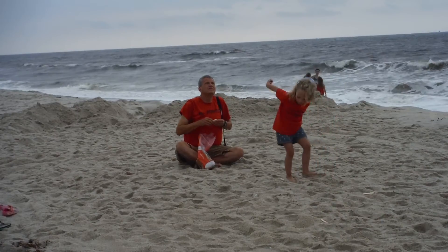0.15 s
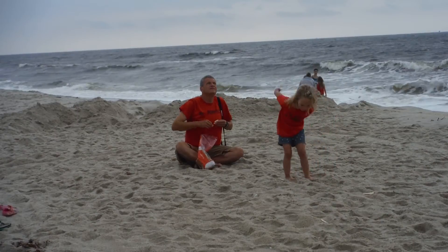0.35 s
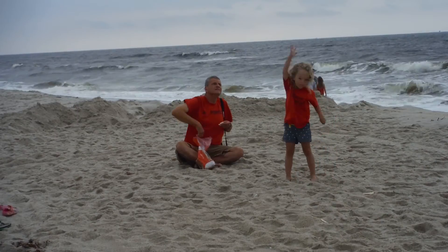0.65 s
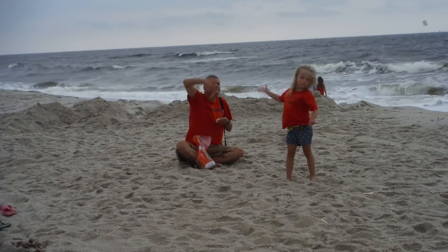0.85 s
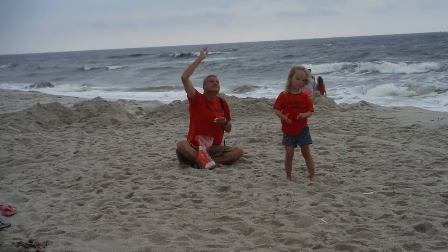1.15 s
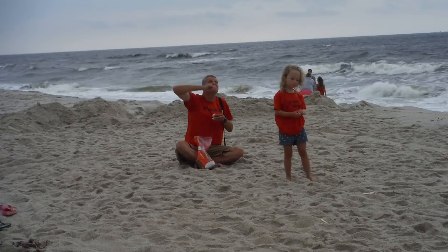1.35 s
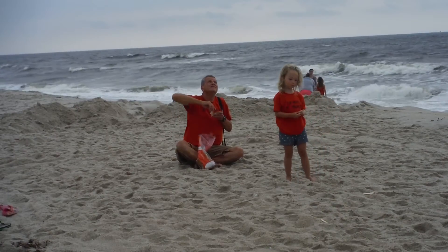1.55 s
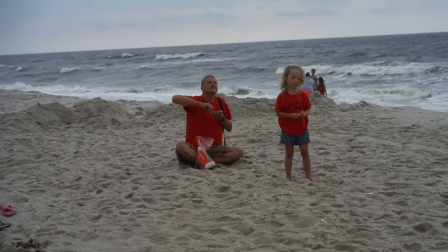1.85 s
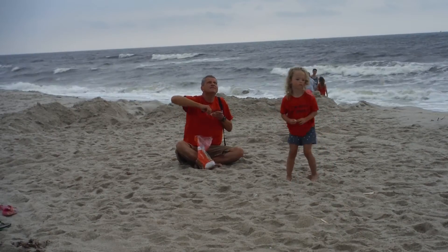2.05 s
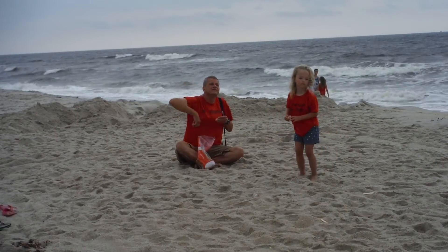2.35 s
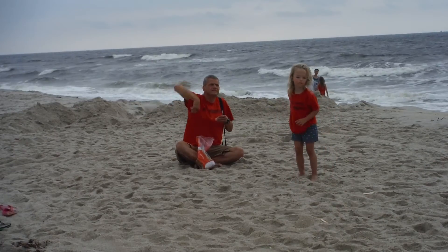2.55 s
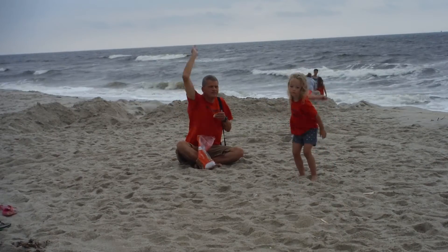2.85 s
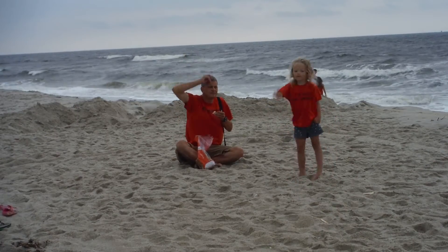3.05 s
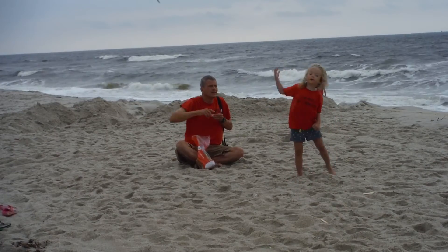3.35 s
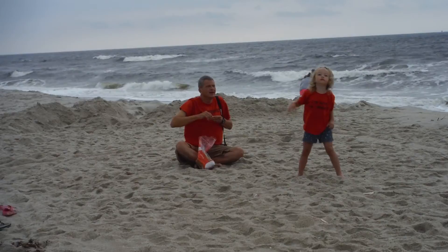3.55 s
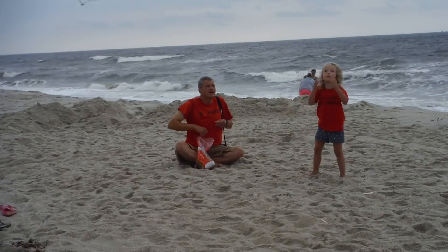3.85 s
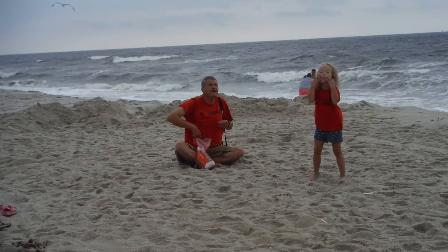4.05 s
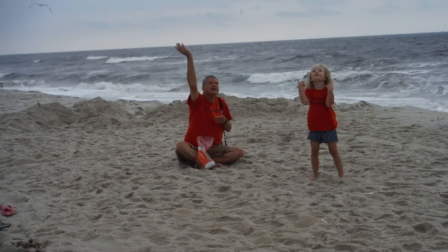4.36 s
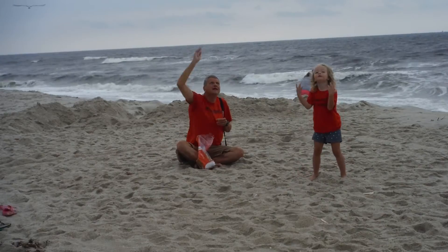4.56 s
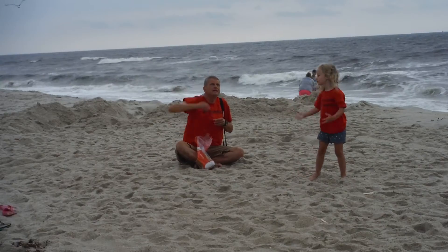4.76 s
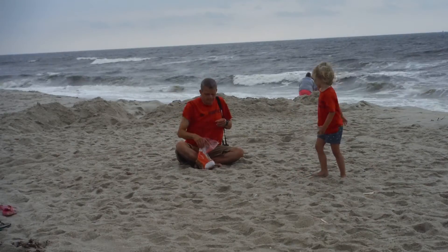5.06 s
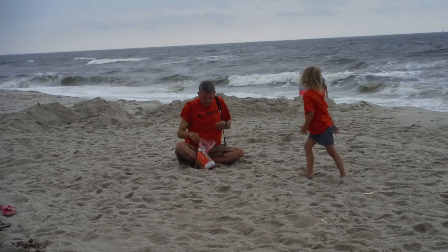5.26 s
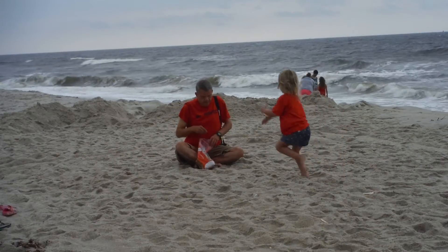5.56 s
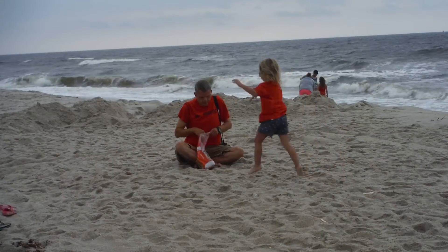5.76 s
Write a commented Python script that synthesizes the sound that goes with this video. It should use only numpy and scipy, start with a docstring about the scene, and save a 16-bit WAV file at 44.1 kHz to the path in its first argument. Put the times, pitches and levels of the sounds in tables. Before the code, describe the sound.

On an open beach, gulls call in bursts: high squeals that crack and warble, dry pulsed rasps and lower nasal squawks. Surf roars and hisses steadily behind, swelling later. Strong low wind buffets the microphone, hardest in the first second and a half, with a few faint hollow knocks close by. A last rasp and falling squeal end it. Dry outdoor sound, the same in both channels.

```python
"""Gulls rasp, squawk and squeal over a beach, with surf behind and wind buffeting the microphone.
It opens on a short squeal amid hard gusts; light knocks follow at times from 0.2 s to 3.4 s.
Rasps of uneven pulses come from 0.4 s on, among high squeals that crack and warble; lower squawks
join at 1.1 s. The surf's filtered noise hisses most at 3.6 s and roars most at 4.9 s.
A last rasp and a squeal that ends low come at 5.5 s."""
import sys
import numpy as np
from scipy import signal
from scipy.fft import rfft, irfft
from scipy.io import wavfile
from scipy.ndimage import uniform_filter1d

SR = 44100
rng = np.random.default_rng(int(sys.argv[2]) if len(sys.argv) > 2 else 0)


def to_wav(sig):
    """Store sig (one row per channel, or 1-D mono) as 16-bit WAV at the path in sys.argv[1].

    Samples outside -1..1 are clipped; the rate is SR.
    """
    pcm = np.clip(np.atleast_2d(sig), -1, 1) * 32767
    pcm = np.round(pcm).astype(np.int16)
    wavfile.write(sys.argv[1], SR, pcm.T)  # frames by channels


N = 260190
TIME = np.arange(N) / SR
EDGE_HZ = 15700  # upper edge of the recorder's band


def gain_of(db):
    """Decibels to gain."""
    return 10 ** (np.asarray(db) / 20)


def evened(x):
    """Scales to an rms of 1."""
    return x / np.sqrt(np.mean(x ** 2) + 1e-20)


def read(points, hz):
    """Reads a spectrum on a log-frequency axis."""
    f, value = np.transpose(points)
    return np.interp(np.log(hz + 1), np.log(f + 1), value)


def add(mix, s, sound):
    """Mixes a sound in at time s."""
    part = mix[max(round(s * SR), 0):][:len(sound)]
    part += sound[:len(part)]


def drift(size, hz):
    """Smooth random motion of rms about 1: noise whose spectrum falls off as a bell of width hz."""
    padded = size + SR // 8  # the spare end keeps the result from looping
    f = np.fft.rfftfreq(padded, 1 / SR)
    smooth = irfft(rfft(rng.standard_normal(padded)) * np.exp(-(f / hz) ** 2))
    return evened(smooth)[:size]


def coloured(x, spectrum):
    """Causal (minimum-phase) filter with the given spectrum."""
    log_gain = np.log(gain_of(read(spectrum, abs(np.fft.fftfreq(2048, 1 / SR)))))
    taps = np.fft.ifft(np.exp(np.conj(signal.hilbert(log_gain)))).real
    return signal.fftconvolve(x, taps)[:len(x)]


def noise(spectrum):
    """Steady noise of rms 1 with the given spectrum."""
    shape = gain_of(read(spectrum, np.fft.rfftfreq(N, 1 / SR)))
    return evened(irfft(rfft(rng.standard_normal(N)) * shape, N))


def in_band(x, lo, hi):
    """Scales x so that the band lo-hi has an rms of 1."""
    f = np.fft.rfftfreq(N, 1 / SR)
    return x / np.std(irfft(rfft(x) * ((f > lo) & (f < hi)), N))


# swell of the surf: (time [s], roar level in 700-1700 Hz [dB], foam level in 5.5-14 kHz [dB])
SURF_SWELL = [(0.0, -51.5, -49), (1.28, -50.5, -47), (2.61, -48.5, -45), (2.99, -48.5, -44),
              (3.58, -46.5, -39.5), (4.91, -44.5, -42.5), (5.9, -46.5, -43)]
# spectrum of the breakers: (frequency [Hz], relative level [dB])
ROAR_SPECTRUM = [(100, -4), (300, 6.5), (500, 3), (900, -2), (1600, -5), (3000, -10.5), (6000, -42),
                 (12000, -59)]
# spectrum of the foam as the microphone hears it, with the microphone's lift near 7-8 kHz: (frequency [Hz],
# relative level [dB])
FOAM_SPECTRUM = [(1180, -29), (2000, -11), (2840, -3.5), (3180, -2), (4360, -1.5), (5600, 0), (6200, 1.5),
                 (7050, 3.5), (7950, 2.5), (8660, 0), (12600, -13.5), (15500, -22.5)]


def surf(churn_db=1.1, fizz_db=1.0):
    """Breakers roar and their foam hisses: two bands of noise, both churning slightly."""
    s, roar_db, foam_db = np.transpose(SURF_SWELL)
    roar = in_band(noise(ROAR_SPECTRUM), 700, 1700)
    foam = in_band(noise(FOAM_SPECTRUM), 5500, 14000)
    roar_level_db = np.interp(TIME, s, roar_db) + churn_db * drift(N, 20)
    foam_level_db = np.interp(TIME, s, foam_db) + fizz_db * drift(N, 22)
    return roar * gain_of(roar_level_db) + foam * gain_of(foam_level_db)


# gusts on the microphone: (time of peak [s], half length [s], rumble boost over the breeze [dB])
GUST_PEAKS = [(0.016, 0.048, 11), (0.532, 0.27, 7), (0.833, 0.037, 11.5), (0.971, 0.066, 8),
              (1.212, 0.016, 10), (1.37, 0.045, 5.5), (2.36, 0.23, 9), (2.682, 0.029, 9), (3.128, .04, 7),
              (3.302, 0.14, 9.5), (3.753, 0.034, 6.5), (3.94, 0.21, 6), (4.393, 0.06, 4)]
# spectrum of the low wind: (frequency [Hz], relative level [dB])
RUMBLE_SPECTRUM = [(8.8, -39), (15, 0.5), (54, 2.5), (128, -8.5), (200, -18.5), (260, -25.5), (440, -120)]
# spectrum of the smaller eddies: (frequency [Hz], relative level [dB])
FLUTTER_SPECTRUM = [(70, 7.5), (150, 5.5), (250, -6), (400, -16.5), (700, -30), (1500, -37), (4000, -77)]


def wind(rumble_db=-28.5, flutter_db=-46, flutter_growth=1.88, lumps_db=3, gust_db=3.0):
    """Gusts rumble over a steady breeze; smaller eddies flutter in lumps and grow faster with the wind."""
    strength_db = sum(db * np.exp(-((TIME - s) / half) ** 2) for s, half, db in GUST_PEAKS)
    gusty = noise(RUMBLE_SPECTRUM) * gain_of(gust_db * drift(N, 16.5))
    rumble = in_band(gusty, 20, 130)
    lumpy = noise(FLUTTER_SPECTRUM) * gain_of(lumps_db * drift(N, 40))
    flutter = in_band(lumpy, 150, 400)
    rumble = rumble * gain_of(rumble_db + strength_db)
    return rumble + flutter * gain_of(flutter_db + flutter_growth * strength_db)


# hardest eddies: (time [s], peak level before the trim [dB], sharpness of the pop as a pitch [Hz])
EDDY_THUMPS = [(.031, -10.5, 173), (0.373, -14.5, 306), (.52, -9.5, 176), (.612, -9.5, 82), (.82, -8, 343),
               (.869, -2, 663), (1.089, -17, 332), (.965, -12.5, 274), (.991, -18.5, 375),
               (1.209, -16.5, 390), (3.107, -12.5, 227), (2.337, -9.5, 347), (3.189, -11, 194),
               (3.291, -11.5, 189), (4.002, -11.5, 251), (4.375, -12.5, 199)]


def buffets(trim_db=-1, skirt=2.12, vary_db=.5):
    """A passing eddy pushes the microphone, then pulls; the smaller it is, the sharper the pop."""
    out = np.zeros(N)
    t = np.arange(-SR // 40, SR // 40) / SR
    for s, db, hz in EDDY_THUMPS:
        u = np.pi * hz * t
        push_pull = -u / (1 + u ** 2) ** skirt * np.hanning(len(t))
        add(out, s + t[0], gain_of(db + trim_db) * push_pull / push_pull.max())
    return out * gain_of(vary_db * drift(N, 20))


# small knocks close by: (time [s], peak level before the trim [dB])
KNOCK_HITS = [(0.223, -30), (.266, -32), (0.508, -35), (.696, -26.5), (.824, -20.5), (1.575, -22),
              (3.446, -25.5)]
# what they ring with: (frequency before random detuning [Hz], relative level [dB], 60 dB decay time [s])
KNOCK_RINGS = [(1210, -11, 0.023), (1262, 8.5, 0.059), (1387, 2.5, .035)]


def knocks(trim_db=-3):
    """Light, hollow knocks: a few decaying modes, each detuned at random on every hit."""
    out = np.zeros(N)
    t = np.arange(SR // 10) / SR
    for s, db in KNOCK_HITS:
        ring = np.zeros(len(t))
        for hz, mode_db, t60 in KNOCK_RINGS:
            tuned_hz = hz * rng.uniform(0.88, 1.05)
            ring += gain_of(mode_db - 60 * t / t60) * np.sin(2 * np.pi * tuned_hz * t)
        add(out, s, gain_of(db + trim_db) * ring / abs(ring).max())
    return out


def beach(x, echo_db=-21, t60=0.12):
    """Sand and dunes scatter a faint, short echo: sparse random taps that die away."""
    t = np.arange(SR // 3) / SR
    sparse = rng.standard_normal(len(t)) * (rng.random(len(t)) < 2000 / SR)
    taps = sparse * (t > .004) * gain_of(-60 * t / t60)
    return x + gain_of(echo_db) * signal.fftconvolve(x, taps / np.linalg.norm(taps))[:N]


def resonate(x, hz, width):
    """A resonance of gain 1 that follows the curve hz: shift it to zero, smooth, shift back."""
    turn = np.exp(2j * np.pi * np.cumsum(hz) / SR)
    r = np.exp(-np.pi * width / SR)
    return 2 * (turn * signal.lfilter([1 - r], [1, -r], x / turn)).real


# the gulls' throat: (frequency [Hz], relative level [dB])
THROAT_SPECTRUM = [(500, -31), (1300, -12), (1850, -1), (2300, -1.5), (3300, 3.5), (4600, 1), (5900, -1),
                   (7000, 1), (8000, -2.5), (9000, -9.5), (10200, -19), (11500, -29), (15500, -41)]


def rasp(top, rise_s, fall_s, db, rough, ring_hz, pulse_share=.48, depth_db=17, slack=.5, sag=0.099,
         jitter=0.201, uneven_db=4.0, air=0.21, ring_width_hz=600, ring=0.41, scoop=0.21):
    """Uneven pulses, about one for two cycles of the syrinx's ring; both scoop upward as it tightens."""
    t = np.arange(top - rise_s, top + fall_s, 1 / SR)
    u = (t - top) / np.where(t < top, rise_s, fall_s)
    ease = abs(u) ** 1.5  # 0 at the loudest moment, 1 at either end

    bend = 1 - np.where(u < 0, slack, sag) * rough * ease
    pulse_hz = pulse_share * ring_hz * bend * (1 + jitter * rough ** 2 * drift(len(t), 820))
    turns = np.cumsum(pulse_hz) / SR
    offset = (turns - np.round(turns)) / pulse_hz * SR  # samples from the nearest pulse
    pulses = np.sinc(offset * .8) * np.exp(-(offset / 6) ** 2)
    pulses = evened(pulses * gain_of(uneven_db * rough * drift(len(t), 1100)))

    drive = air * rng.standard_normal(len(t)) - pulses
    ring_curve_hz = ring_hz * (1 - np.where(u < 0, scoop, sag) * np.sqrt(rough) * ease)
    drive = drive + ring * resonate(drive, ring_curve_hz, ring_width_hz)
    # little radiates below the ring
    drive = signal.lfilter(*signal.butter(2, 0.49 * ring_hz, "high", fs=SR), drive)
    voice = evened(coloured(drive, THROAT_SPECTRUM))
    return t[0], voice * gain_of(db - depth_db * ease) * signal.windows.tukey(len(t), .1)


def whistle(hz, register, over_db, under_db, jitter=0.0037, wobble=0.0023, shimmer_db=2.08):
    """The syrinx locks onto the 2nd, 3rd or 4th multiple of its slow swing, which shows as undertones."""
    size = len(hz)
    hz = hz * (1 + jitter * drift(size, 580) + wobble * drift(size, 64))
    out = np.zeros(size)
    for lock in np.unique(register):
        swing = 2 * np.pi * np.cumsum(hz) / SR / lock
        locked = uniform_filter1d(1. * (register == lock), size=130)  # short crossfade between registers
        lines = int(EDGE_HZ * lock / np.median(hz[register == lock]))
        low_boost_db = 13 * (lock == 2)  # undertones are stronger in the lowest register
        for k in range(1, lines + 1):
            if k % lock:  # between the whistle's harmonics: an undertone of unsteady phase
                line = gain_of(under_db + low_boost_db) * np.cos(k * swing + 0.9 * drift(size, 380))
            else:  # the whistle itself (k == lock, at 0 dB) or one of its overtones
                line = gain_of((over_db + 2.45 * drift(size, 140)) * (k > lock)) * np.cos(k * swing)
            throat_db = read(THROAT_SPECTRUM, hz * k / lock) - read(THROAT_SPECTRUM, hz)
            out += locked * line * gain_of(throat_db)
    return np.sqrt(2) * out * gain_of(shimmer_db * drift(size, 124))


OPEN_S, OPEN_OVER_DB = .023, -5  # longest stay in the opening register; overtones while the call climbs
# the voice cracks one register down: (time [s], length [s], overtone level [dB])
VOICE_CRACKS = [(0.062, .03, 1), (0.624, .019, -4), (0.687, .027, -2), (0.75, .05, -6), (1.79, .019, 4),
                (1.833, .032, -0.5), (2.032, .03, 4), (2.336, .015, -6), (2.39, .025, -8),
                (3.725, .04, 2.5), (4.497, .014, 5), (4.549, .021, 8), (4.591, .031, 8.5),
                (4.646, .04, 6.5), (5.73, .019, 2), (5.794, .05, -5)]


def registers(t, home, climb_s, over_db):
    """Which multiple of its slow swing the syrinx locks onto (climbing from the 2nd), and overtones in dB."""
    age = t - t[0]
    register = 2 + (age >= min(OPEN_S, climb_s)) + (age >= climb_s)
    register = np.minimum(register, home)
    overtones = np.where(register < home, OPEN_OVER_DB, over_db)
    for s, length, crack_db in VOICE_CRACKS:
        cracked = (t >= s) & (t < s + length)
        register = np.maximum(register - cracked, 2)
        overtones = np.where(cracked, crack_db, overtones)
    return register, overtones


CATCH_S = 0.003  # the level change leads the top of each swoop by this much
# even upward swoops of pitch: (start [s], end [s], period [s], height [share of the pitch],
# sharpness [exponent], level change near the top [dB])
PITCH_SWOOPS = [(0.516, 0.636, 0.052, .02, 0.53, 0), (1.858, 2.048, .0635, 0.09, 2, -7),
                (2.182, 2.353, 0.052, 0.022, 0.58, 0), (3.354, 3.498, 0.049, 0.25, 3, -13),
                (3.497, 3.637, .0465, .4, 4.6, -4), (3.637, 3.729, .046, .11, 2, -3),
                (4.343, 4.659, .053, .11, 2.74, -6), (5.577, 5.737, .053, 0.021, 0.54, -1)]


def warble(t):
    """Pitch factor and level in dB of the swoops, each a rectified sine raised to its sharpness."""
    factor, db = np.ones(len(t)), np.zeros(len(t))
    for start, end, period, height, sharpness, top_db in PITCH_SWOOPS:
        active = (t > start) & (t < end)
        swoop = abs(np.sin(np.pi * (t - start) / period)) ** sharpness * active
        catch = abs(np.sin(np.pi * (t + CATCH_S - start) / period)) ** sharpness * active
        factor = factor + height * swoop
        db = db + top_db * catch
    return factor, db


def call(start, end, hz_a, hz_b, hz_c, db, fade_db, over_db, under_db, climb_s=OPEN_S, flatness=2,
         glide=.5, arch_db=3, waver=.005, attack_db=3, warbling=False):
    """One whistled call: pitch and level follow an arch, and the pitch steps with the register."""
    t = np.arange(start, end, 1 / SR)
    u = np.linspace(-1, 1, len(t))
    home = int(np.clip(round(hz_b / 1200), 2, 4))  # top register: keeps the slow swing near 1200 Hz
    register, overtones = registers(t, home, climb_s, over_db)

    # the swing speeds up by 4 % for each register below the top one
    step = register / home * (1 + .04 * (home - register))
    bend = round(0.01636 * SR)  # samples in each of two smoothing passes
    smooth_step = uniform_filter1d(uniform_filter1d(step, bend), bend)
    step = step + glide * (smooth_step - step)  # part of each jump becomes a glide

    swoop, swoop_db = warble(t) if warbling else (1, 0)
    arch_hz = hz_b + (np.where(u < 0, hz_a, hz_c) - hz_b) * abs(u) ** flatness
    hz = arch_hz * (1 + waver * drift(len(t), 26.2))
    level_db = db + arch_db * (np.mean(u ** 2) - u ** 2) - fade_db * u + swoop_db
    level_db = level_db - attack_db * np.exp(-(t - start) / .014)  # swells in, time constant 14 ms
    voice = whistle(hz * step * swoop, register, overtones, under_db)
    return voice * gain_of(level_db) * signal.windows.tukey(len(t), min(0.0035 / (end - start), 1))


# rasps: (loudest moment [s], rise [s], fall [s], level [dB], roughness [0-1], syrinx ring [Hz])
RASP_CALLS = [ (.412, .028, 0.016, -31.5, 0.4, 2950), (1.106, 0.038, .028, -30.5, 0.78, 2363),
              (1.343, 0.019, 0.047, -33.5, 0.75, 2217), (1.613, 0.023, 0.022, -26.5, .55, 2706),
              (1.774, 0.031, 0.021, -32, 0.74, 2586), (2.085, 0.039, 0.03, -26.5, 0.67, 2710),
              (2.505, 0.028, 0.04, -21, .7, 2650), (2.635, 0.11, 0.035, -30, 0.47, 2270),
              (2.745, .03, 0.04, -28, 0.2, 2315), (2.852, 0.015, 0.011, -29.5, 0.72, 2170),
              (3.328, 0.03, 0.027, -27.5, .7, 2606), (3.706, 0.061, 0.049, -33, 0.65, 2197),
              (3.829, 0.034, 0.041, -23, 0.79, 2410), (4.304, 0.028, 0.025, -31.5, .7, 2600),
              (4.723, 0.03, 0.035, -19, 0.76, 2503), (4.86, 0.12, 0.064, -25.5, 0.69, 2300),
              (4.945, .065, 0.058, -30.5, .45, 2200), (5.49, .027, 0.032, -26, .42, 2750)]
# lower squawks: (start [s], end [s], top-register pitch at start, middle and end [Hz, Hz, Hz],
# level [dB], fade either side of the middle [dB], overtones [dB], undertones [dB])
SQUAWK_CALLS = [ (1.092, 1.204, 3607, 3170, 3080, -47, 4, -11, -12),
                (1.202, 1.271, 3190, 3470, 3130, -37.5, 0, -10, -23),
                (1.242, 1.313, 3300, 3290, 3000, -39.5, -6, -18, -31),
                (1.311, 1.342, 2260, 2214, 2170, -34, 0, -7, -34),
                (2.492, 2.557, 2534, 2300, 2120, -36, 6, -17, -16.5),
                (2.638, 2.734, 3340, 3194, 3070, -28.5, -5, -5, -22),
                (2.73, 2.793, 3286, 3246, 3070, -28.5, 1.5, -5, -24),
                (2.764, 2.845, 2397, 2290, 2045, -29.5, -1, -5.5, -32),
                (3.313, 3.413, 3200, 2970, 3200, -41.5, 2, -10, -28),
                (3.39, 3.675, 3396, 3540, 3740, -41.5, 1, -12, -30),
                (3.772, 3.815, 1427, 1595, 2060, -43, -1, -27, -32),
                (3.851, 3.897, 2270, 1980, 1890, -38.5, 7, -6, -27),
                (3.878, 3.984, 3093, 3090, 2990, -43.5, -5.5, 2, -7.5),
                (4.726, 4.772, 2355, 2413, 2110, -33.5, 3, -1.5, -22),
                (4.87, 4.962, 2176, 2212, 2160, -34.5, -1.5, -7, -18.5)]
# high squeals: the same columns as the squawks, then
# (climb to the top register [s], flatness of the pitch arch [exponent])
SQUEAL_CALLS = [ (0, .087, 4840, 4790, 4800, -34, 8, -1, -24, 0.0019, 1.8),
                (.403, 0.789, 5280, 5000, 4430, -36.5, 4.5, 3.5, -24, 0.088, 1.73),
                (1.583, 1.8, 4800, 4840, 4850, -31, 0, -6, -23, 0.07, 1.54),
                (1.785, 2.053, 4950, 4720, 4650, -35, 1, -5, -23, 0, 2),
                (2.077, 2.43, 5000, 5050, 4550, -31, -0.5, 4, -27.5, 0.059, 5.8),
                (3.328, 3.758, 4720, 4242, 4244, -30, -2.5, -5.5, -15.5, 0, 2),
                (4.29, 4.69, 4830, 4450, 4280, -34.5, -2.5, -2.5, -18, 0.034, 1.6),
                (5.482, 5.822, 4850, 4916, 3770, -31, 2.5, 3, -25, 0.07, 3.9)]


def gulls():
    """All the gulls' rasps, squawks and squeals, with the beach's echo."""
    out = np.zeros(N)
    for row in RASP_CALLS:
        s, sound = rasp(*row)
        add(out, s, sound)
    for row in SQUAWK_CALLS:
        add(out, row[0], call(*row, glide=.2, arch_db=5.5, waver=.006, attack_db=1))
    for row in SQUEAL_CALLS:
        squeal = call(*row, glide=.42, arch_db=2.5, waver=.00402, attack_db=6, warbling=True)
        add(out, row[0], squeal)
    return beach(out)


def scene():
    """Everything reaches one microphone, alike in both channels."""
    mono = surf() + wind() + buffets() + knocks() + gulls()
    return np.array([mono, mono])


def record(dry):
    """The recorder's band limit, with soft ends."""
    soft = dry * signal.windows.tukey(N, .001)
    low_pass = signal.firwin(511, EDGE_HZ, window=("kaiser", 9), fs=SR)
    return signal.oaconvolve(soft, low_pass[None], "same")


dry = scene()
out = record(dry)
to_wav(out)
```